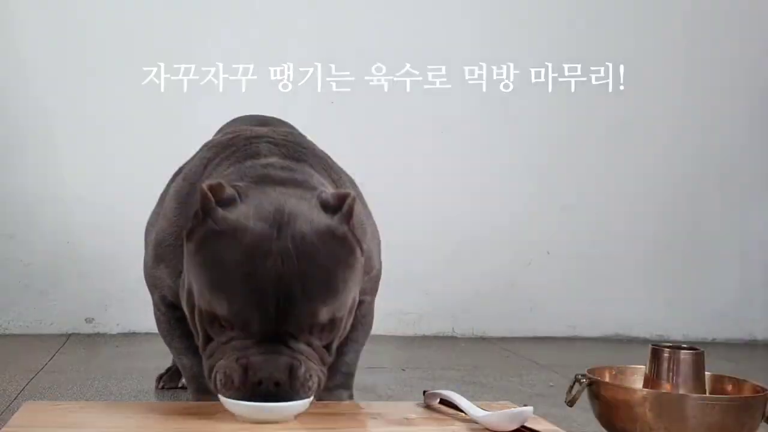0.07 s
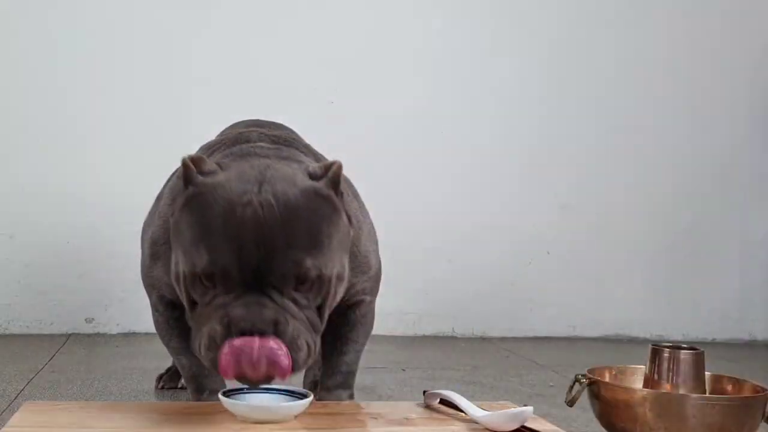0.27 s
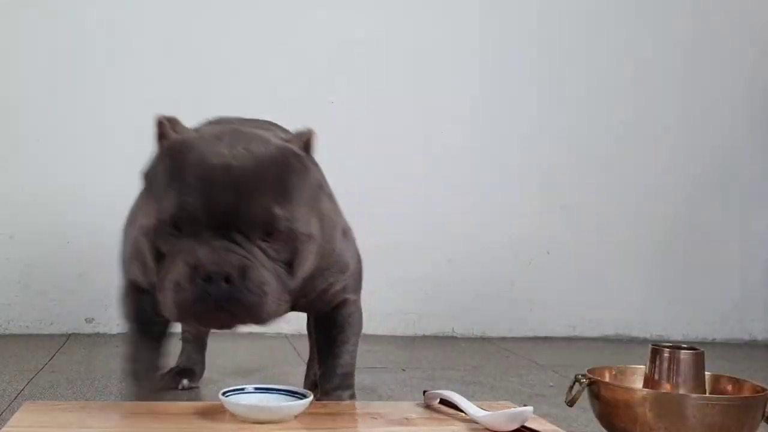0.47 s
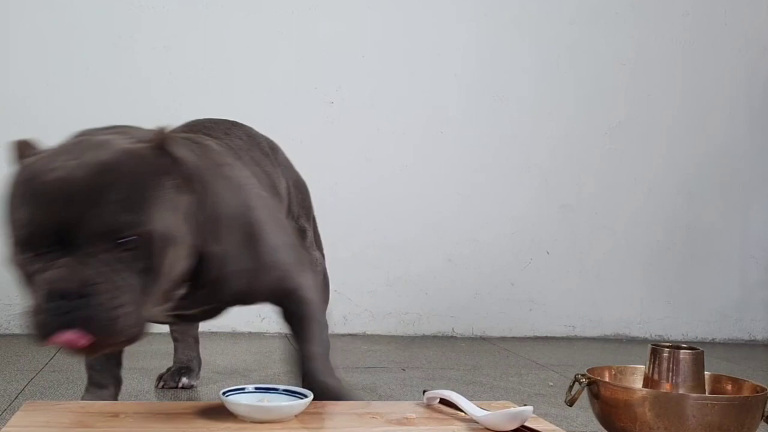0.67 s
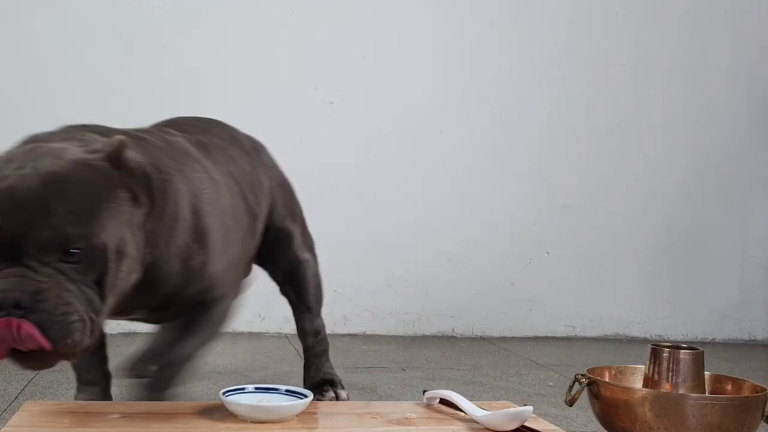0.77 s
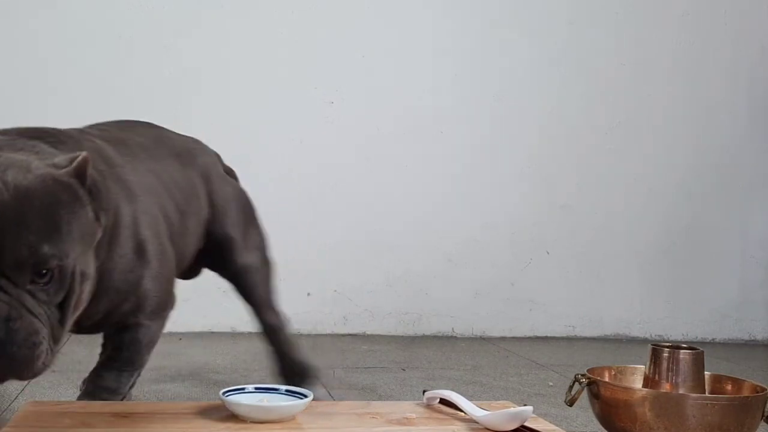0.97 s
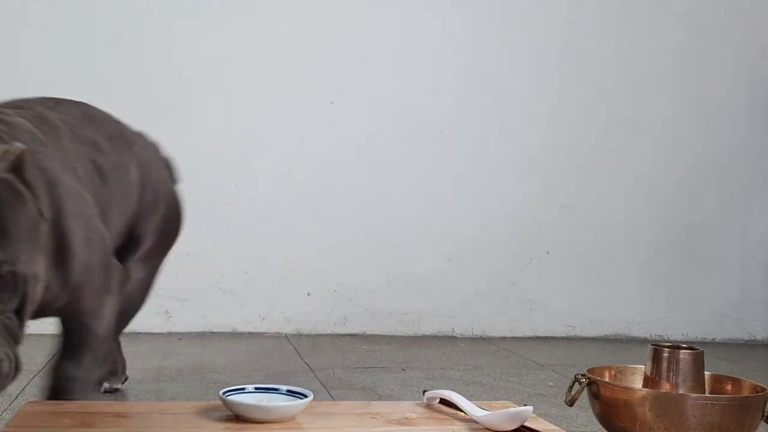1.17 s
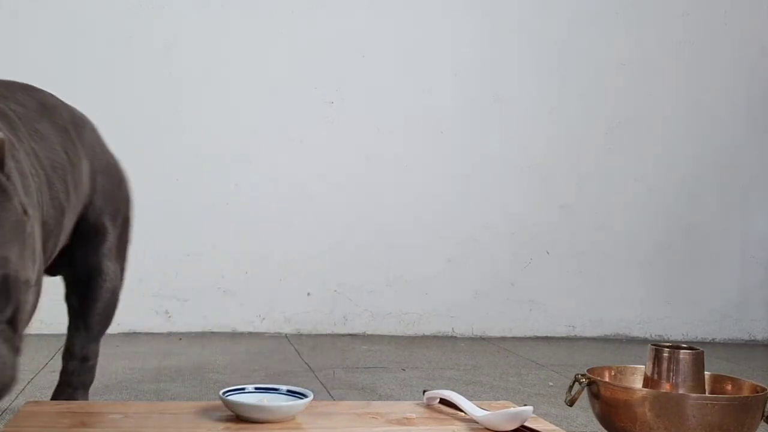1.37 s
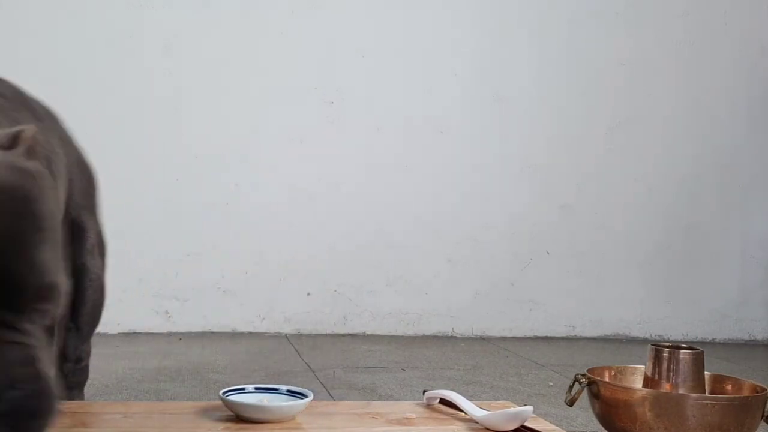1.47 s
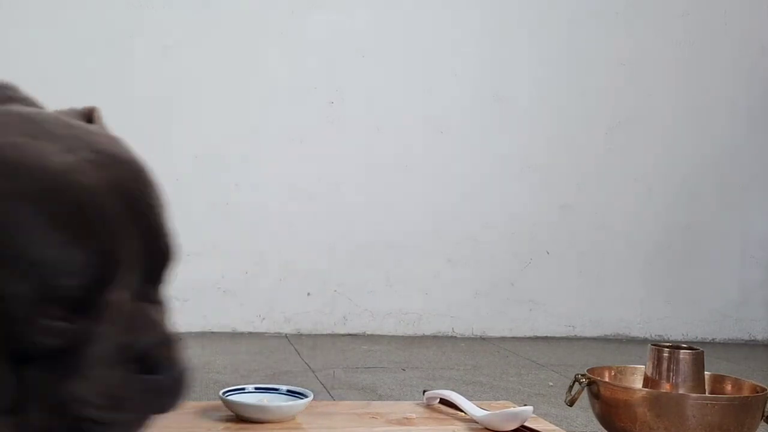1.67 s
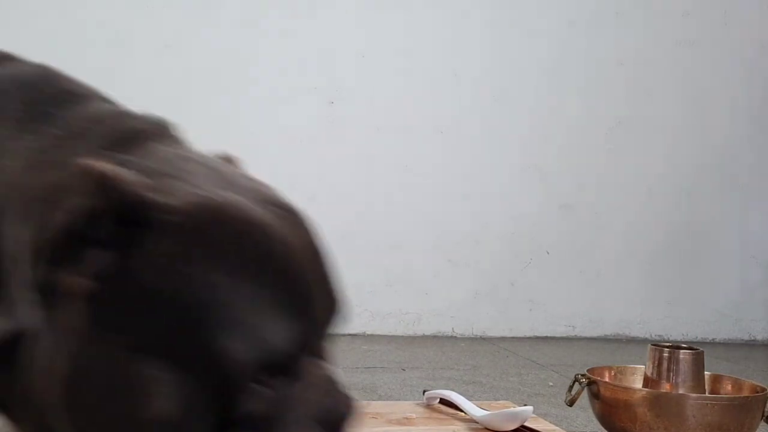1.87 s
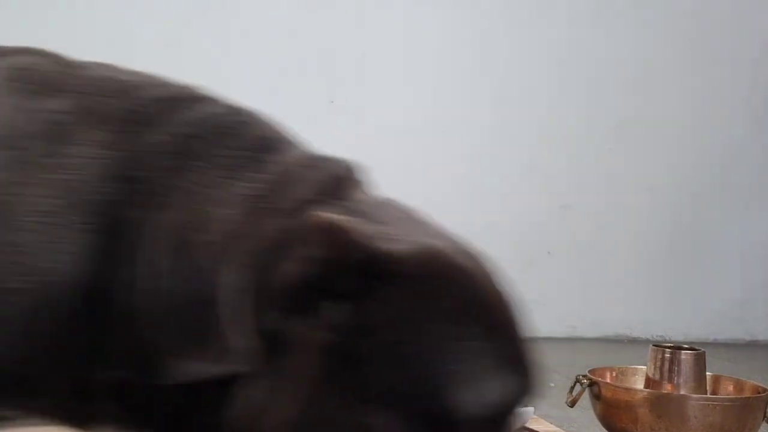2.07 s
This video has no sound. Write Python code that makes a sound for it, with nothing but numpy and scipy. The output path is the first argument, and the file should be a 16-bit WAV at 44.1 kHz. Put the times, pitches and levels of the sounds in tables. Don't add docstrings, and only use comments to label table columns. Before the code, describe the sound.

A heavy dog laps and smacks wetly at a small bowl, then shuffles across a hard floor

```python
import sys
import numpy as np
from scipy import signal
from scipy.io import wavfile
from scipy.ndimage import map_coordinates

SR = 44100
rng = np.random.default_rng(int(sys.argv[2]) if len(sys.argv) > 2 else 0)


def gain_from_db(level_db):
    decades = np.asarray(level_db, float) / 20
    return 10 ** decades


def persist_wave(psi):
    counts = np.round(np.clip(psi, -1, 1) * 32767).astype(np.int16)
    wavfile.write(sys.argv[1], SR, np.atleast_2d(counts).T)


N = 94109

# (frequency [Hz], level per Hz [dB])
AIR_SPECTRUM = [(30, -40), (56, 5), (130, -15.5), (750, -20.5), (1250, -26), (5000, -25), (9000, -28.5),
                (16000, -40.5)]
AIR_DB = -53.5
# (time [s], hiss gain [dB])
STIR = [(.2, 12), (.55, 13), (.8, 2), (1.119, 10.5), (1.27, -4), (1.35, -3), (1.41, -7), (1.47, -5.5),
        (1.52, 1.5), (1.56, 0), (1.8, 4.5), (2.1, 5.5)]
# (frequency [Hz], share of the stir [0-1])
STIR_SHARE = [(800, 0.21), (1100, 0.95), (5000, 0.27), (12000, 0.44)]
# (frequency [Hz], likeness [0-1])
AIR_LIKENESS = [(60, 1), (300, 0.8), (1500, 0.034)]

# (time [s], length [s], level [dB], centre [Hz], width [Hz])
SCUFFS = [(-.04, 0.22, -47, 3700, 8100), (-.03, 0.25, -47.5, 1630, 1170), (-.02, 0.37, -41.5, 617, 586),
          (.19, 0.056, -49.5, 2460, 4460), (.29, 0.16, -54, 6070, 8100), (.3, 0.18, -49.5, 590, 654),
          (.398, 0.11, -48.5, 7000, 9600), (.4, 0.058, -42, 3420, 790), (.44, 0.32, -51, 560, 1040),
          (.485, 0.14, -48, 4800, 10100), (.59, 0.081, -46.5, 3700, 7500), (.705, 0.046, -52.5, 4200, 6960),
          (.89, 0.12, -54.5, 3170, 7560), (.905, 0.16, -49.5, 650, 690), (1.025, 0.1, -45, 4300, 10300),
          (1.04, 0.1, -48, 1110, 2090), (1.195, 0.056, -59, 3730, 5430), (1.53, 0.11, -53, 2850, 9600),
          (1.645, 0.21, -58, 3333, 5550), (1.8, 0.11, -56.5, 4170, 8300), (1.822, 0.11, -59, 440, 600),
          (1.885, 0.16, -57, 3519, 6900), (2.0, 0.35, -57.5, 4060, 8600),
          (-.03, 0.35, -52, 197.2, 247), (0.019, .1, -50, 3260, 900), (0.199, 0.25, -62.5, 6960, 1500),
           (0.323, 0.16, -53.5, 3230, 557.3), (0.327, 0.065, -52.5, 7100, 1200),
           (0.403, 0.095, -53, 228, 202), (.41, 0.11, -55.5, 1890, 1500), (.425, 0.061, -49.5, 3120, 600),
           (0.601, 0.11, -63, 1450, 260), (0.608, .1, -56, 3800, 400), (0.648, 0.093, -58.5, 2800, 2500),
           (0.704, 0.012, -41.5, 6588, 3845), (0.853, 0.05, -59, 2970, 1200),
           (0.993, 0.063, -53.5, 4770, 9000), (1.058, 0.065, -54, 5040, 11000),
           (1.099, 0.056, -61, 3020, 3980), (1.168, 0.1, -57.5, 534, 568.5),
           (1.305, 0.06, -62.5, 3600, 915), (1.7, 0.17, -72, 660, 317.6), (1.534, 0.095, -54.5, 557, 625),
           (1.569, 0.42, -65, 920, 1674), (1.859, 0.48, -60, 925.9, 1922), (1.898, 0.033, -57, 3200, 2520),
           (2.07, 0.057, -56, 505, 300)]
SCUFF_SKEW, SCUFF_EDGE = 0.7, 1.6
GRIT_DB, GRIT_PER_S = 2.5, 1800
WIDE_DB, WIDE_HZ = -2.5, 446

# (time [s], level [dB], floor tone [Hz], rise [s], t60 [s])
THUDS = [(.01, -32, 93.3, 0.024, 0.3), (.045, -34, 63, 0.004, 0.18), (0.117, -33.5, 112.6, 0.012, 0.12),
         (0.359, -29, 221, 0.0042, 0.045), (0.377, -29, 109.3, 0.016, 0.14), (.38, -39, 56.6, 0.05, 0.54),
         (0.461, -38, 107.4, 0.024, 0.24), (0.544, -25.5, 98.3, 0.034, 0.24),
         (.6, -30.5, 103.1, 0.017, 0.24), (0.731, -40, 85.5, 0.01, 0.22), (0.82, -45, 88, 0.019, 0.75),
         (0.915, -36.5, 58.3, 0.019, 0.72), (0.938, -37, 84.4, 0.015, 0.59),
         (1.014, -26.5, 89, 0.0093, 0.091), (1.079, -46, 101.6, 0.015, 0.63),
         (1.163, -41, 73.2, 0.013, 0.21), (1.235, -40, 100, 0.029, 0.25), (1.499, -49, 63.2, 0.032, 0.66),
         (1.666, -44.5, 111, 0.0064, 0.14), (1.712, -62.5, 59, 0.016, 0.59),
         (1.83, -39.5, 229, 0.0023, 0.056), (1.828, -40, 100, 0.011, 0.13),
         (1.871, -45, 109.3, 0.023, 0.23), (1.977, -43, 55.6, 0.039, .5), (2.067, -45, 62, 0.011, 0.32)]
BOARD_RATIO, BOARD_DB, BOARD_SHORTER = 2.086, -6, 0.32

# (time [s], level [dB], tone [Hz], t60 [s])
POPS = [(.026, -34, 730, 0.027), (0.039, -41.5, 1410, 0.27), (.051, -28, 562, 0.027),
        (.077, -38, 1370, 0.018), (0.08, -23, 825, 0.016), (.091, -22.5, 590, 0.022),
        (.1125, -23.5, 683, 0.03), (.126, -28, 710, 0.018), (.142, -36, 580, 0.016),
        (.153, -33, 540, 0.024), (.165, -45, 510, 0.018), (.187, -35, 598, .025), (0.204, -35, 882, 0.028),
        (0.201, -35.5, 1438, 0.067), (0.337, -31, 886, 0.02), (0.407, -25.5, 3730, 0.013),
        (0.4095, -26.5, 3320, 0.021), (.597, -21.5, 2914, 0.013), (.5985, -32.5, 920, 0.029),
        (0.5981, -24, 1446, 0.055), (0.603, -24, 3764, 0.023), (0.611, -33.5, 1483, 0.043),
        (.661, -54, 1390, .04), (0.687, -46, 1440, 0.12), (0.743, -50.5, 1386, 0.079),
        (.823, -46.5, 1397, 0.079), (1.091, -32, 1435, 0.074), (1.177, -49.5, 1380, 0.08),
        (1.211, -44.5, 1585, .03), (1.2057, -33.5, 4730, 0.021), (1.2082, -37.5, 5880, 0.019),
        (1.208, -31.5, 6650, 0.0079), (1.212, -55.5, 2282, 0.12), (1.241, -48.5, 2400, 0.024),
        (1.408, -44, 845, 0.021), (1.438, -54, 750, 0.016), (1.454, -40.5, 646, 0.026),
        (1.476, -32.5, 705, 0.027), (1.486, -48, 670, 0.031), (1.505, -46, 720, .04),
        (1.554, -42, 494, 0.018), (1.565, -50, 470, 0.012), (1.595, -46, 423, 0.027),
        (1.598, -40.5, 1503, 0.051), (1.91, -48, 2470, 0.056), (2.078, -35, 1270, 0.023)]
POP_RISE_S = 0.0011

# (time [s], level [dB], centre [Hz], width [Hz])
TAPS = [(0.211, -35.5, 6660, 5000), (0.7059, -30.5, 6300, 4000), (0.843, -43.5, 248, 316),
        (0.8624, -37.5, 5700, 5900), (0.901, -33.5, 7300, 3000), (0.9145, -22, 262, 613),
        (0.9145, -38.5, 2180, 900), (1.036, -75, 9100, 10000), (1.0765, -27.5, 9700, 6840),
        (1.314, -47, 500, 720), (1.401, -54, 292, 300), (1.326, -42.5, 5860, 4960),
        (1.591, -48, 6940, 8000), (1.6924, -37, 3330, 2020), (1.693, -38, 7750, 7950),
        (1.828, -34, 346, 417), (1.914, -42, 13000, 5000), (2.053, -41.5, 11700, 5000)]
SCRAPE, SCRAPE_S, SCRAPE_HZ = 3.8, 0.00074, 2800

# (frequency [Hz], t60 [s])
WALL_T60 = [(80, .4), (600, .32), (3000, .26), (14000, .14)]
# (frequency [Hz], likeness [0-1])
WALL_LIKENESS = [(80, 0.85), (300, 1), (1000, 0.1), (8000, 0.039)]
WALL_RUB_DB, WALL_POP_DB, WALL_THUD_DB = -6.0, -6.0, -9.0
FIRST_S, NEAR, NEAR_S = 0.0012, 4.0, 0.006

# (time [s], left lag, negative leads [samples], left treble excess [dB])
PLACE = [
    (0.7, -2, 6.7),
    (.9, -14.5, 8.2),
    (1.5, -15.5, 6.8),
    (1.7, -12.5, 7.6),
]

# (frequency [Hz], gain [dB])
CAPSULE = [(5000, 1.5), (6800, -2), (8500, -5), (11000, -2), (14500, 1)]
LOW_CUT_HZ, EDGE_HZ = 20.7, 15950


def evened(x):
    return x / np.sqrt(np.mean(x ** 2) + 1e-20)


def read(points, hz):
    f, value = np.transpose(points)
    return np.interp(np.log(hz + 1), np.log(f + 1), value)


def add(mix, s, sound):
    at = round(s * SR)
    part = mix[max(at, 0):][:len(sound) + min(at, 0)]
    part += sound[max(-at, 0):][:len(part)]


def band(x, hz, width):
    centre = np.sqrt(hz ** 2 + width ** 2 / 4)
    edges = np.clip(centre + np.array([-width, width]) / 2, 20, SR / 2 - 2000)
    sos = signal.butter(1, edges, "band", fs=SR, output="sos")
    return signal.sosfilt(np.vstack([sos, sos]), x)


def pair(frames, likeness, gain):
    a, b, c, d = rng.standard_normal((frames, 257, 4)).T
    same = np.clip(read(likeness, np.fft.rfftfreq(512, 1 / SR)), -1, 1)[:, None]
    left = a + 1j * b
    right = same * left + np.sqrt(1 - same ** 2) * (c + 1j * d)
    return signal.istft(np.array([left, right]) * gain, nperseg=512, noverlap=384)[1]


def air():
    hz = np.fft.rfftfreq(512, 1 / SR)
    frames = N // 128 + 5
    s, db = np.transpose(STIR)
    stir_db = np.interp(np.arange(frames) * 128 / SR, s, db)
    gain = gain_from_db(read(AIR_SPECTRUM, hz)[:, None] + read(STIR_SHARE, hz)[:, None] * stir_db)
    return gain_from_db(AIR_DB) * evened(pair(frames, AIR_LIKENESS, gain)[:, :N])


def scuff(length, db, hz, width, noise, grit):
    count = round(length * SR)
    n = np.arange(count)
    grains = noise[:count] * gain_from_db(GRIT_DB * grit[(n * GRIT_PER_S / SR).astype(int)])
    stroke = np.sin(np.pi * (n / count) ** SCUFF_SKEW) ** SCUFF_EDGE
    return gain_from_db(db) * stroke * evened(band(grains, hz, width))


def ring(db, hz, rise, t60):
    t = np.arange(0, min(rise + t60, 0.8), 1 / SR)
    swell = np.sin(np.pi / 2 * np.minimum(t / rise, 1)) ** 2
    return swell * gain_from_db(db - 60 * t / t60) * np.sin(2 * np.pi * hz * t)


def thud(mix, s, db, hz, rise, t60):
    add(mix, s, ring(db, hz, rise, t60))
    add(mix, s, ring(db + BOARD_DB, hz * BOARD_RATIO, rise * BOARD_SHORTER, t60 * BOARD_SHORTER))


def pop(db, hz, t60):
    return ring(db, hz, POP_RISE_S, t60)


def tap(db, hz, width, crumbs):
    t = np.arange(600) / SR
    scrape = crumbs * t / SCRAPE_S * np.exp(-t / SCRAPE_S) * (hz > SCRAPE_HZ)
    x = band(SCRAPE * scrape - signal.unit_impulse(600), hz, width)
    return gain_from_db(db) * x / abs(x).max()


def walls(x):
    frame_t = np.arange(250) * 128 / SR
    t60 = read(WALL_T60, np.fft.rfftfreq(512, 1 / SR))[:, None]
    tail = pair(250, WALL_LIKENESS, gain_from_db(-60 * frame_t / t60))
    t = np.arange(tail.shape[1]) / SR
    tail = tail * np.clip(t / FIRST_S - 1, 0, 1)
    tail = tail * (1 + NEAR * np.exp(-t / NEAR_S))
    return signal.fftconvolve(x[None], tail / np.linalg.norm(tail[0]), axes=1)[:, :N]


def microphones(x):
    n = np.arange(N)
    s, lag, db = np.transpose(PLACE)
    bass = signal.sosfilt(signal.butter(1, 3000, fs=SR, output="sos"), x)
    treble = x - bass
    tilt = gain_from_db(np.interp(n / SR, s, db) / 2)
    left = map_coordinates(bass + treble * tilt, [n - np.interp(n / SR, s, lag)], order=3)
    return np.array([left, bass + treble / tilt])


def scene():
    floor, clicks, rubs, own_left, own_right = np.zeros((5, N))
    noise = rng.standard_normal((48, 3, SR // 2))
    grit = np.minimum(rng.exponential(1, (48, 4000)), 3)
    for k, (s, *row) in enumerate(SCUFFS):
        for mix, fresh in zip((rubs, own_left, own_right), noise[k]):
            add(mix, s, scuff(*row, fresh, grit[k]))
    for row in THUDS:
        thud(floor, *row)
    for s, *row in POPS:
        add(clicks, s, pop(*row))
    for s, *row in TAPS:
        add(clicks, s, tap(*row, rng.standard_normal(600)))
    sent = gain_from_db(WALL_RUB_DB) * rubs + gain_from_db(WALL_POP_DB) * clicks + gain_from_db(WALL_THUD_DB) * floor
    wide = np.array([microphones(own_left)[0], microphones(own_right)[1]])
    wide = gain_from_db(WIDE_DB) * signal.sosfilt(signal.butter(1, WIDE_HZ, "high", fs=SR, output="sos"), wide)
    return microphones(rubs + clicks + floor) + wide + walls(sent) + air()


def top_cut(x):
    return signal.sosfilt(signal.butter(12, 15450, fs=SR, output="sos"), x)


def record(dry):
    hz = np.linspace(0, SR / 2, 257)
    capsule = signal.firwin2(127, hz, gain_from_db(read(CAPSULE, hz)), fs=SR)
    edge = signal.firwin(511, EDGE_HZ, window=("kaiser", 9), fs=SR)
    mix = signal.sosfilt(signal.butter(2, LOW_CUT_HZ, "high", fs=SR, output="sos"), dry)
    mix = signal.oaconvolve(mix, capsule[None], "same", axes=1)
    mix = signal.oaconvolve(mix, edge[None], "same", axes=1)
    return top_cut(mix)


dry = scene()
out = record(dry)
persist_wave(out)
```